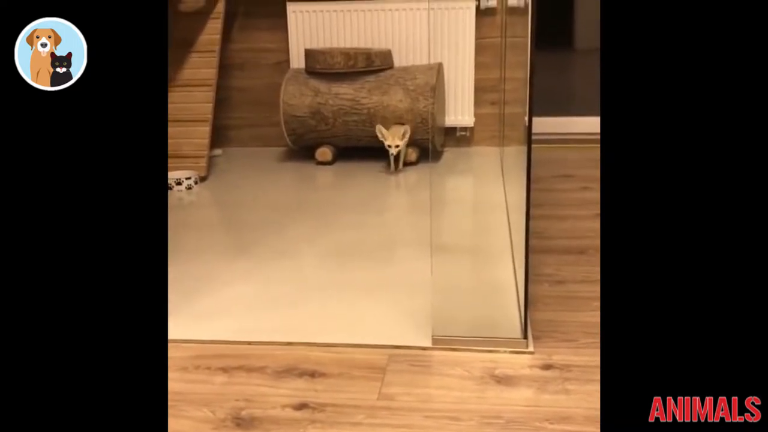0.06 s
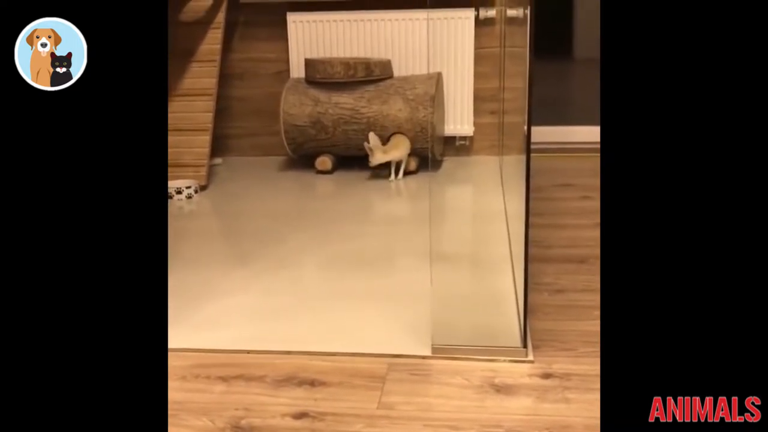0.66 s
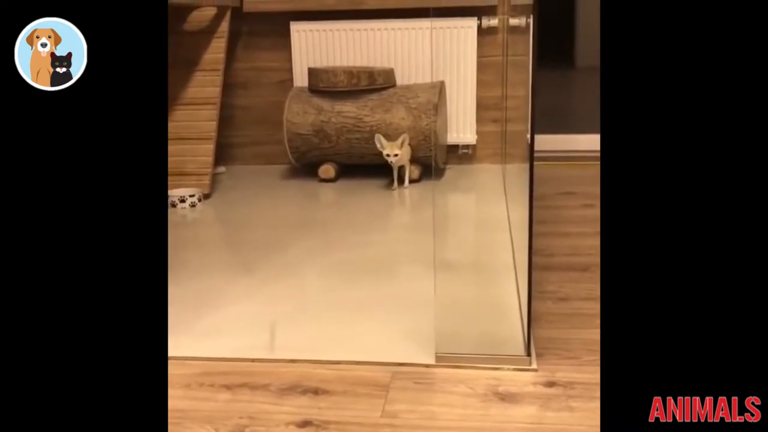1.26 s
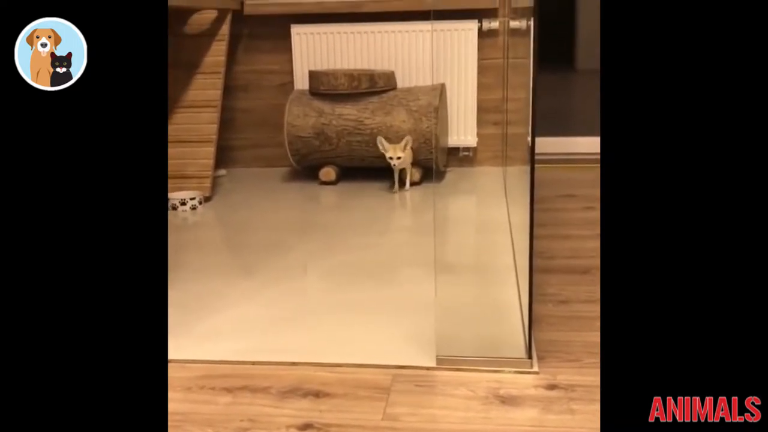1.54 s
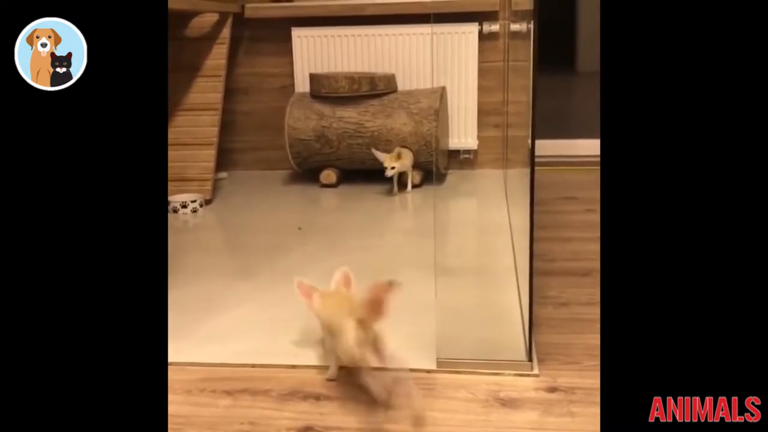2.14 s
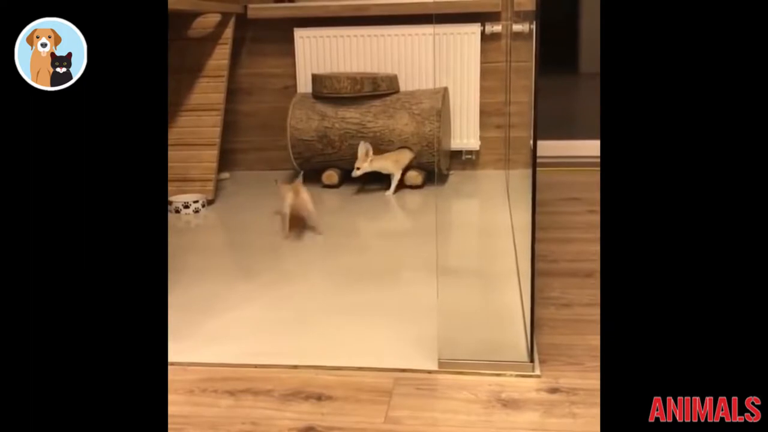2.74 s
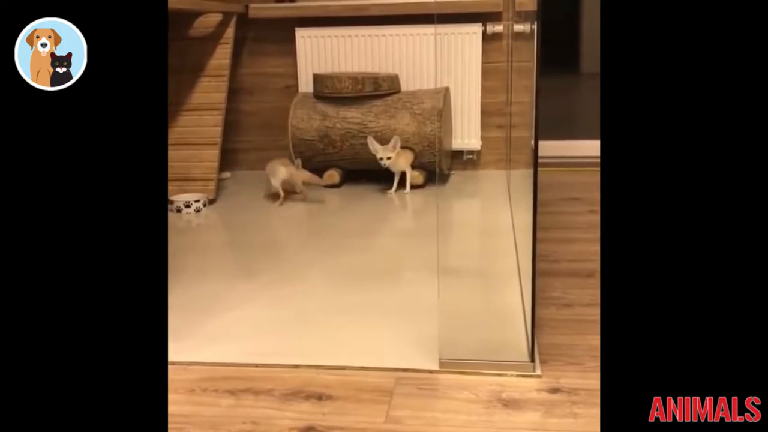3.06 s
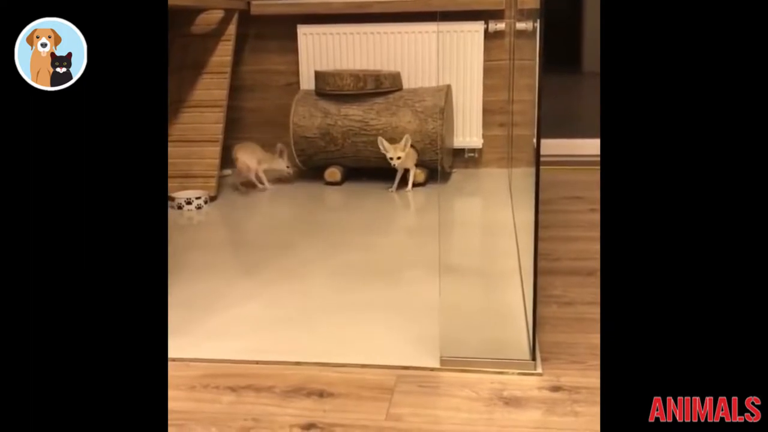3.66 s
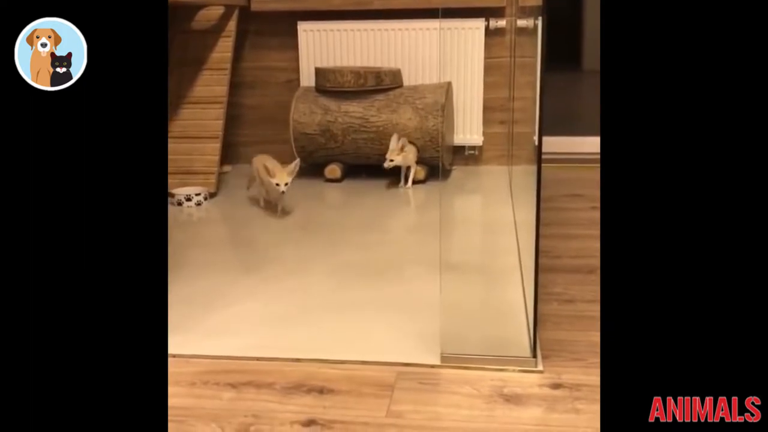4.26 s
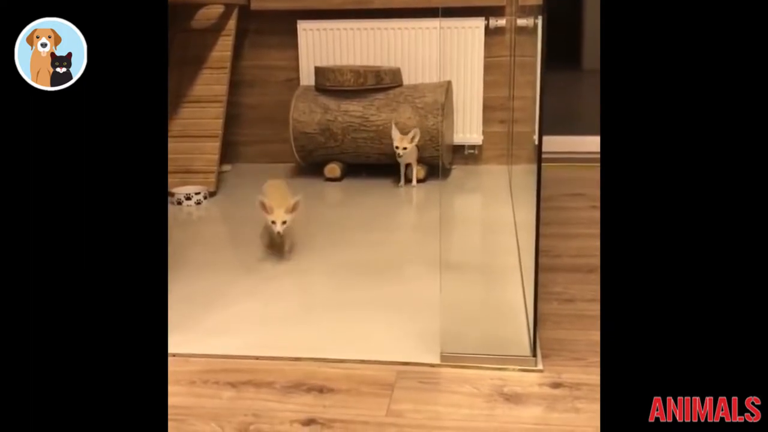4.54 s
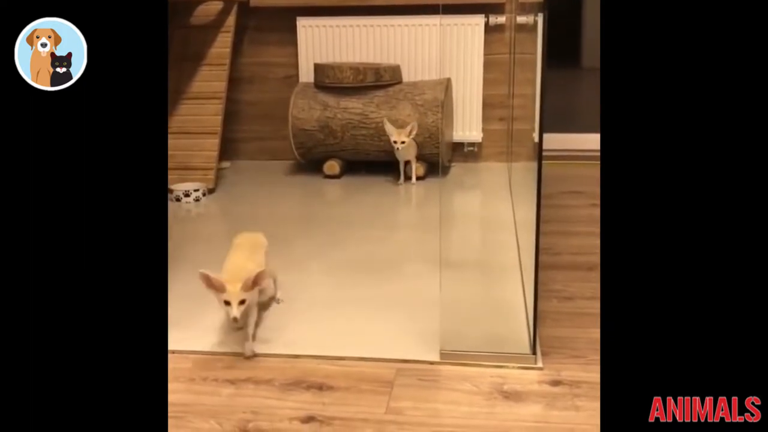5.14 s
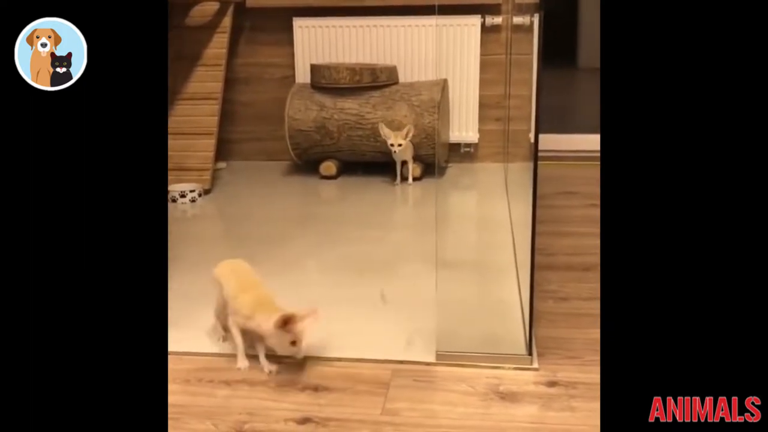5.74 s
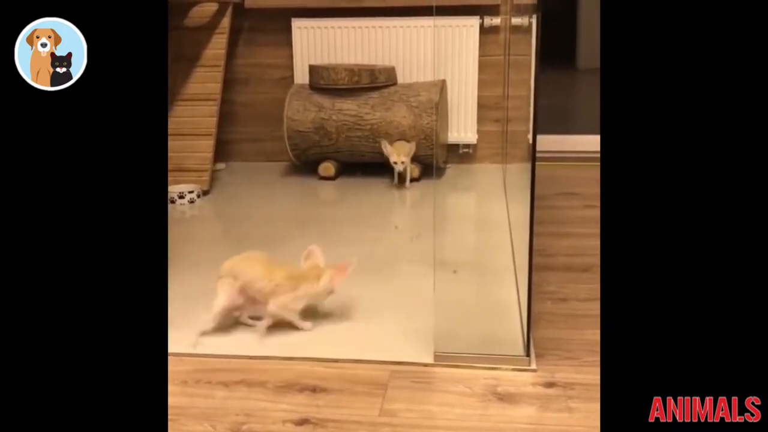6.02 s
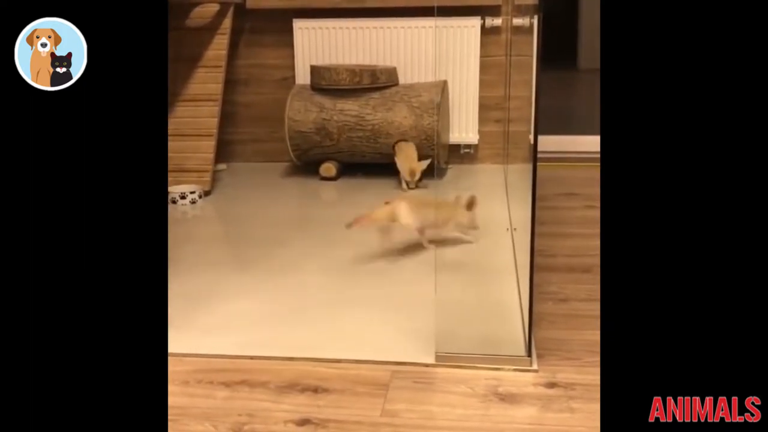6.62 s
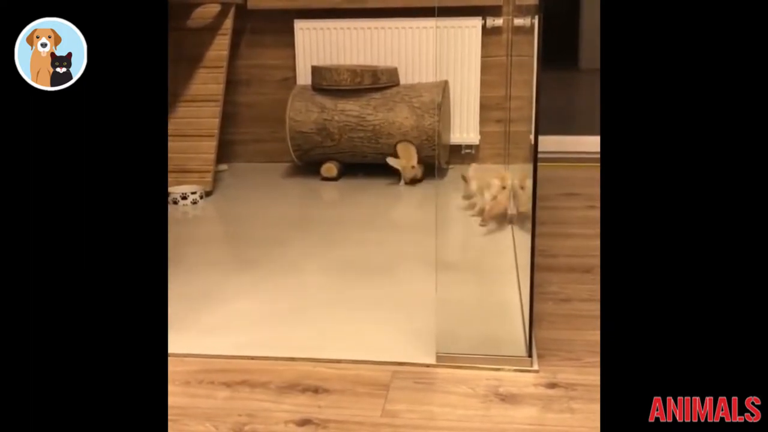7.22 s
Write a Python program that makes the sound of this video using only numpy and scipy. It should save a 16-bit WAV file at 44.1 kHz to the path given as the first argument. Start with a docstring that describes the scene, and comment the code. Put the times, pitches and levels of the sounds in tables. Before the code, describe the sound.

A small fox's claws skitter and scrabble across a hard smooth floor in two quick dashes, in a bare, echoing indoor pen.

```python
"""Two small foxes in a bare, echoing pen with a hard smooth floor, on a hand-held mono microphone.
Over faint room air come far-off scuffs, one sharp snap and a few soft bumps on the microphone. At 1.8 s
one fox bolts from close beside it: the floor board thumps and claws scrabble for grip. From about 3 s
it scuffs and taps around the wooden furniture at the back, then trots forward. At 5.9 s it skitters
off again, and near 7 s its claws give a short squeal on the glass wall."""
import sys
import numpy as np
from scipy import signal
from scipy.fft import rfft, irfft
from scipy.io import wavfile

SR = 44100
rng = np.random.default_rng(int(sys.argv[2]) if len(sys.argv) > 2 else 0)


def put_to_file(sound):
    """Save the sound as 16-bit audio at rate SR, in the file named by the first command-line argument."""
    columns = np.atleast_2d(sound).T  # one column per channel
    safe = np.clip(columns, -1, 1)
    whole_steps = np.round(safe * 32767)
    wavfile.write(sys.argv[1], SR, whole_steps.astype(np.int16))


N = 321489
TIME = np.arange(N) / SR

# tone of the pen's air and of its echo: frequency_hz, level_db
AIR_SPECTRUM = [(15, -50), (25, -23.5), (48, 9), (72, 4), (293, -4), (436, -8.5), (781, -11), (868, -9.5),
                (1920, -13.5), (3930, -16.5), (10500, -20), (12900, -15), (14000, -23.5)]
ECHO_SPECTRUM = [(60, -13), (250, 1.5), (1000, 2.5), (3500, 2), (7000, 2), (14000, 2.5)]
# how long the echo hangs in the pen: frequency_hz, t60_s
ECHO_DECAY = [(100, 2.14), (400, 0.91), (1200, 1.19), (3300, 0.89), (4600, 1.33), (6400, 0.45),
              (9000, 0.71), (14000, 0.41)]
# soft dry bumps on the microphone: start_s, level_db, pitch_hz
MIC_BUMPS = [(1.119, -46, 91), (1.294, -36.5, 104), (1.338, -32, 67), (1.351, -29.5, 56.4),
             (1.478, -43.5, 85)]
# spells of low rumble, from running footfalls on the floor and from handling the microphone:
# middle_s, half_length_s, level_db
LOW_RUMBLES = [(1.42, 0.053, -54.5), (2.42, 0.14, -58.5), (5.36, 0.014, -55), (5.47, 0.059, -49.5),
               (6.43, 0.067, -64), (7.22, 0.028, -59)]
# resonances of that rumble: pitch_hz, width_hz, level_db
LOW_RUMBLE_MODES = [(38, 25, -6), (60, 24, 2), (85, 68, -5), (158, 110, -13.5)]

# dull scuffs of paws and body, far off: middle_s, half_length_s, level_db, tilt_db_per_octave
FAR_SCUFFS = [(0.026, 0.08, -52, -0.3), (0.203, 0.014, -45, 0), (2.824, 0.33, -57.5, 1.5),
              (3.035, 0.016, -61, 4.5), (3.152, 0.042, -54.5, -1.5), (3.217, 0.012, -56, 4),
              (3.298, 0.023, -48.5, 1.4), (3.443, 0.1, -66.5, -1.5), (5.137, 0.018, -60, 2),
              (5.461, 0.013, -51.5, -1), (6.2, .08, -63.5, -7), (6.71, 0.25, -62, 1.5)]
# padded paws land on floor or hollow furniture: middle_s, half_length_s, level_db, pitch_hz
PAW_KNOCKS = [(1.367, 0.0016, -44, 500), (1.396, 0.024, -63, 466), (1.747, 0.0027, -51, 432),
              (2.015, 0.015, -49, 513), (2.075, .005, -48, 850), (2.112, 0.013, -50.5, 500),
              (2.312, 0.017, -42.5, 730), (2.313, 0.0052, -37, 1550), (3.206, .012, -47, 368),
              (3.297, .038, -59, 114), (3.885, 0.0036, -49.5, 1350), (4.196, 0.015, -58.5, 600),
              (4.648, 0.098, -78, 720), (4.848, 0.013, -56, 640), (5.678, 0.062, -65.5, 1040),
              (6.396, .024, -56, 430), (6.885, 0.0094, -57, 410)]
# claws tap wood at the back: start_s, level_db, ring_hz, tilt_db_per_octave
WOOD_TAPS = [(3.7953, -48.5, 2800, -1), (3.8406, -52, 2400, 0.5), (3.881, -44.5, 5700, 1.5),
             (4.0797, -47.5, 4300, 2), (4.106, -42, 2500, 4), (4.1785, -41.5, 4000, 3.5),
             (4.3642, -43, 2700, 2.5)]
# resonances of tapped wood and of claws skidding on glass: pitch_hz, width_hz, level_db
WOOD_MODES = [(1350, 73, -18), (2140, 260, -4), (2500, 260, -7), (5660, 500, -7)]
GLASS_MODES = [(1730, 200, -5), (2480, 270, -3), (2700, 260, -5)]
# something small and hard snaps: start_s, level_db, ring_hz, tilt_db_per_octave
HARD_SNAP = [(.6012, -30, 2950, -0.23)]
# the floor board under the leap: pitch_hz, relative_level_db, t60_s
FLOOR_MODES = [(108, -8, 0.33), (269.4, -4, 0.16), (288, -1, 0.12), (344, 0.5, 0.072), (412, -2.5, 0.09),
               (551, -19.5, 0.9), (720, -9.5, 0.069), (980, 10, 0.018)]
# the loudest single claw clicks: start_s, level_db, ring_hz, tilt_db_per_octave
CLAW_CLICKS = [(1.378, -50.5, 5500, 3), (1.469, -51.5, 3700, 3.5), (1.74, -37.5, 4300, 6),
               (1.8251, -33, 4130, 2), (2.0122, -30.5, 3420, -1), (2.0687, -29.5, 5400, 2.5),
               (2.2004, -35, 3730, 5), (2.222, -30.5, 6530, 2), (2.2962, -29, 4160, -1),
               (2.3329, -32, 3800, 1.5), (2.4321, -43, 3700, -4), (4.6038, -54, 4740, -4.5),
               (4.6598, -50.5, 4580, 6.5), (4.7994, -55.5, 5000, 0.5), (4.8344, -43, 5300, -0.5),
               (5.095, -56, 4600, 1), (5.1111, -51, 8500, -3), (5.3162, -47, 3870, -2.5),
               (5.3812, -54.5, 3570, -5), (5.8576, -36.5, 6040, 0.5), (5.8894, -34.5, 3450, 3),
               (5.9456, -33, 5450, 2), (6.0047, -47.5, 3540, -3.5), (6.0935, -37.5, 4070, .5),
               (6.1657, -41, 4230, -1), (6.1913, -39.5, 3940, 1), (6.2617, -47, 4000, -2),
               (6.389, -41, 4100, -1.5), (6.61, -44.5, 3970, 0.5), (7.0958, -46, 5500, -1.5)]
# echo against direct sound of those clicks as the fox moves about: time_s, echo_db
CLICK_ECHO_LEVELS = [(1.8, -1.5), (2.3, -3.5), (4.6, -1.5), (5.3, -2.5), (5.9, 0.5), (6.2, -2), (6.45, 1.5)]
# a walking paw brushes the floor: middle_s, half_length_s, hiss_db
PAW_BRUSHES = [(1.325, 0.014, -57.5), (1.385, 0.038, -58), (1.705, 0.017, -55.5), (3.132, 0.036, -57),
               (4.57, 0.092, -63), (4.718, .018, -62.5), (5.394, .02, -58.5), (5.517, 0.054, -54)]
# claws dig in for grip: middle_s, rasp_db
CLAW_GRIPS = [(2.012, -37), (2.068, -33.5), (2.116, -27), (2.262, -32.5), (2.29, -28.5), (2.2982, -22),
              (2.3146, -20.5), (2.359, -27)]
# effort of the paws through each of the two dashes: time_s, rasp_db, hiss_db
BOLT_EFFORT = [(1.83, -49, -41), (1.85, -49, -38), (1.9, -57, -47.5), (1.955, -48, -36.5),
               (2.03, -40, -45.5), (2.13, -35, -42.5), (2.2, -41, -49), (2.27, -32, -40),
               (2.33, -54, -40.5), (2.45, -51, -42.5), (2.6, -49, -56.5), (2.95, -63.5, -67.5)]
SKITTER_EFFORT = [(5.862, -45, -63), (5.88, -46, -44.5), (5.96, -49, -45), (6.07, -59, -54),
                  (6.2, -53, -50.5), (6.275, -53, -47), (6.32, -61, -60), (6.385, -47.5, -51),
                  (6.6, -54, -53.5), (6.85, -55.5, -58.5), (7.04, -58.5, -60), (7.25, -70, -65)]

# tone of each kind of contact: frequency_hz, level_db
SCUFF_SPECTRUM = [(50, -28), (130, -4), (270, 1.5), (600, 0), (800, -3), (1050, -2), (2000, -9),
                  (2900, -8.5), (6000, -16), (9000, -23), (14000, -29)]
TAP_SPECTRUM = [(150, -17), (420, -23), (600, -0.5), (1000, 1), (2400, -0.5), (3800, -5), (6000, -4),
                (9000, -9), (14000, -12.5)]
SNAP_SPECTRUM = [(120, -18), (270, -6), (420, -6), (720, -7.5), (1050, -2.5), (1500, -9.5), (2200, -8),
                 (2900, -4), (3600, -0.5), (4500, -3), (5700, 2), (7600, 0.5), (10000, -6.5), (14000, -1.5)]
CLICK_SPECTRUM = [(100, -11.5), (300, -11), (620, -6), (1000, -6.5), (1500, -6.5), (2200, -3.5), (3300, 1),
                  (5200, 0), (8000, -1), (14000, -6)]
PAD_HISS_SPECTRUM = [(100, -16.5), (400, 2), (1000, -7.5), (1900, -3.5), (3300, -0.5), (6000, 0.5),
                     (9500, 1), (14000, -0.5)]
CLAW_RASP_SPECTRUM = [(100, -39), (280, -28.5), (650, -12.5), (1150, -15), (2000, -12.5), (3000, -5.5),
                      (4100, 2), (5100, -2), (6700, -2.5), (7700, -11), (14000, -28)]


def from_db(db):
    """Decibels to gain."""
    return 10 ** (np.asarray(db) / 20)


def unit_energy(x):
    """Scale so that the squares sum to one."""
    return x / np.sqrt(np.sum(x ** 2) + 1e-20)


def at_hz(points, hz):
    """Read a table along a log-frequency axis."""
    known_hz, values = np.transpose(points)
    return np.interp(np.log(np.maximum(hz, 1)), np.log(known_hz), values)


def add(track, start_s, sound):
    """Mix a sound into a track from start_s on."""
    start = max(round(start_s * SR), 0)
    track[start:start + len(sound)] += sound[:max(N - start, 0)]


def around(middle_s):
    """The half second about a moment, as a slice."""
    start = max(round((middle_s - .25) * SR), 0)
    return slice(start, start + SR // 2)


def swell(middle_s, half_s, part=slice(None)):
    """A bell-shaped stroke of pressure."""
    return np.exp(-np.minimum(((TIME[part] - middle_s) / half_s) ** 2, 80) / 2)


def coloured(x, spectrum, tilt_db=0, size=2048):
    """Minimum-phase filter, tilted by tilt_db per octave above 400 Hz; white noise keeps its level."""
    hz = np.maximum(np.arange(size // 2 + 1) * SR / size, 1)
    gain_db = at_hz(spectrum, hz) + tilt_db * np.log2(np.maximum(hz, 400))
    cepstrum = irfft(np.log(from_db(gain_db)))
    response = irfft(np.exp(rfft(2 * cepstrum[:size // 2], size)))
    return signal.oaconvolve(x, unit_energy(response))[:len(x)]


def resonate(x, modes):
    """Parallel resonances, each given as pitch_hz, width_hz, peak_db."""
    out = 0
    for hz, width_hz, db in modes:
        r = np.exp(-np.pi * width_hz / SR)
        feedforward = [(1 - r * r) / 2, 0, (r * r - 1) / 2]
        feedback = [1, -2 * r * np.cos(2 * np.pi * hz / SR), r * r]
        out = out + from_db(db) * signal.lfilter(feedforward, feedback, x + 1e-18)
    return out


def ring(hz, t60_s, rise_s):
    """One damped sine after a soft contact."""
    t = TIME[:SR]
    return np.sin(2 * np.pi * hz * t) * from_db(-60 * t / t60_s) * (1 - np.exp(-t / rise_s))


def friction(per_s, spread_db):
    """Stick and slip: tiny random catches of very uneven size; rms 1."""
    sizes = from_db(spread_db * np.minimum(rng.exponential(1, N), 5)) * rng.choice([-1, 1], N)
    catches = rng.random(N) < per_s / SR
    return unit_energy(sizes * catches) * np.sqrt(N)


def hard_contact(spectrum, tilt_db, ring_hz, crack_s, chatter_s, chatter_db, size=2048):
    """A crack, chatter and a short ring: direct sound and room feed, each with 5 ms of unit power."""
    t = TIME[:size]
    envelope = np.exp(-t / crack_s) + from_db(chatter_db) * np.exp(-t / chatter_s)
    burst = envelope * rng.choice([-1, 1], size)
    spike = signal.unit_impulse(size)   # summed over all directions, the spectrum is smooth
    touches = [coloured(x, spectrum, tilt_db) for x in (burst, spike)]
    mode = [(ring_hz, 610, 3)]   # 610 Hz wide, 3 dB over the crack
    return np.array([unit_energy(x + resonate(x, mode)) for x in touches]) * np.sqrt(.005 * SR)


def room_air():
    """The steady low rush and faint hiss of the pen."""
    return coloured(rng.standard_normal(N), AIR_SPECTRUM, size=8192)


def pen_echo(x, first_s, build_s):
    """Dense echoes from bare walls and glass; the top treble dies first."""
    t = TIME[:round(1.3 * SR)]
    edges_hz = np.geomspace(50, 16000, 15)
    white, tail = rng.standard_normal((2, len(t))), 0
    for k, (low, high) in enumerate(zip(edges_hz, edges_hz[1:])):
        band = signal.sosfilt(signal.butter(2, [low, high], "band", fs=SR, output="sos"), white[k % 2])
        tail = tail + band * from_db(-60 * t / at_hz(ECHO_DECAY, np.sqrt(low * high)))
    onset = 1 - np.exp(-np.maximum(t - first_s, 0) / build_s)
    return signal.fftconvolve(x, unit_energy(coloured(tail, ECHO_SPECTRUM) * onset))[:N]


def moving_echo(x, step_s, patterns=5):
    """A running animal keeps meeting a different echo; a few patterns take turns."""
    place = (TIME / step_s).astype(int) % patterns
    return sum(pen_echo(x * (place == k), first_s=0.0023, build_s=0.0021) for k in range(patterns))


def rumble_and_bumps(bump_cycles=2.7):
    """Spells of low rumble from footfalls and handling, and quickly damped jolts of the microphone."""
    rumble = resonate(resonate(rng.standard_normal(N), LOW_RUMBLE_MODES), LOW_RUMBLE_MODES)
    power = sum((from_db(db) * swell(middle_s, half_s)) ** 2 for middle_s, half_s, db in LOW_RUMBLES)
    out = np.sqrt(power) * unit_energy(rumble) * np.sqrt(N)
    for start_s, db, hz in MIC_BUMPS:
        add(out, start_s, from_db(db) * ring(hz, t60_s=bump_cycles / hz, rise_s=0.00034))
    return out


def far_scuffs():
    """Paws and body rub softly, well off the microphone, each scuff with its own brightness."""
    grain = friction(per_s=7000, spread_db=2.5)
    return sum(from_db(db) * coloured(grain * swell(middle_s, half_s), SCUFF_SPECTRUM, tilt_db)
               for middle_s, half_s, db, tilt_db in FAR_SCUFFS)


def paw_knocks(width_share=0.41):
    """Each padded blow stirs a narrow band of the floor or the hollow furniture."""
    out, grain = np.zeros(N), rng.standard_normal(N)
    for middle_s, half_s, db, hz in PAW_KNOCKS:
        part, mode = around(middle_s), [(hz, width_share * hz, 0)]
        pressure = swell(middle_s, half_s, part)
        body = resonate(resonate(grain[part], mode), mode) * pressure
        out[part] += from_db(db) * unit_energy(body) * np.sqrt(np.sum(pressure ** 2))
    return out


def wood_taps(wood_db=-4):
    """Claws knock on wood at the back, and it rings briefly; gives direct sound and room feed."""
    direct, to_room = np.zeros((2, N))
    for start_s, db, hz, tilt_db in WOOD_TAPS:
        tap, feed = hard_contact(TAP_SPECTRUM, tilt_db, hz, crack_s=.001, chatter_s=.041, chatter_db=-6)
        add(direct, start_s, from_db(db) * tap)
        add(to_room, start_s, from_db(db) * feed)
    return [x + from_db(wood_db) * resonate(x, WOOD_MODES) for x in (direct, to_room)]


def glass_squeal(middle_s, half_s):
    """Claws skid at the glass wall, and the stick and slip sets resonances singing."""
    song = resonate(friction(per_s=2200, spread_db=2.0), GLASS_MODES)
    return unit_energy(song) * np.sqrt(N) * swell(middle_s, half_s)


def board_thump(start_s, level_db):
    """The fox pushes off beside the microphone and the floor board rings."""
    out = np.zeros(N)
    board = sum(from_db(db) * ring(hz, t60_s, rise_s=0.0044) for hz, db, t60_s in FLOOR_MODES)
    add(out, start_s, from_db(level_db) * board)
    return out


def hard_clicks(rows, spectrum, chatter_s, bounce_s, bounce_db):
    """Clicks, each with a duller bounce off the nearest surface; gives direct sound and room feed."""
    direct, to_room = np.zeros((2, N))
    for start_s, db, hz, tilt_db in rows:
        click, feed = from_db(db) * hard_contact(spectrum, tilt_db, hz, crack_s=0.00071,
                                                 chatter_s=chatter_s, chatter_db=-7)
        bounce = from_db(bounce_db) * signal.lfilter([.5], [1, -.5], click)
        add(direct, start_s, click)
        add(direct, start_s + bounce_s * rng.uniform(.8, 1.2), bounce)
        add(to_room, start_s, feed)
    return direct, to_room


def dash_effort(dash, strokes_per_s=14.23, spread_db=1.5):
    """The paws push in turn, unevenly; gives the gains of rasp and hiss, silent outside the dash."""
    times_s, *levels_db = np.transpose(dash)
    strengths = rng.standard_normal(256)
    stroke = (TIME - times_s[0]) * strokes_per_s
    uneven_db = spread_db * np.interp(stroke, np.arange(len(strengths)), strengths)
    running = (TIME >= times_s[0]) & (TIME <= times_s[-1])
    return np.array([from_db(np.interp(TIME, times_s, db) + uneven_db) for db in levels_db]) * running


def slipping_paws():
    """Claws catch, rasp and tick while the furry pads hiss over the smooth floor."""
    dash_rasp, dash_hiss = dash_effort(BOLT_EFFORT) + dash_effort(SKITTER_EFFORT)
    rasp_power, hiss_power = dash_rasp ** 2, dash_hiss ** 2
    # a grip is mostly rasp, and half as long when 12.5 dB harder; a brush is mostly hiss
    grips = [(middle_s, 0.0071 * .5 ** ((db + 29) / 12.5), db, db - 20) for middle_s, db in CLAW_GRIPS]
    brushes = [(middle_s, half_s, db - 7, db) for middle_s, half_s, db in PAW_BRUSHES]
    for middle_s, half_s, rasp_db, hiss_db in grips + brushes:
        part = around(middle_s)
        power = swell(middle_s, half_s, part) ** 2
        rasp_power[part] += power * from_db(rasp_db) ** 2
        hiss_power[part] += power * from_db(hiss_db) ** 2
    rasp = coloured(np.sqrt(rasp_power) * friction(per_s=13000, spread_db=2.5), CLAW_RASP_SPECTRUM)
    hiss = coloured(np.sqrt(hiss_power) * friction(per_s=8000, spread_db=3.0), PAD_HISS_SPECTRUM)
    ticks = coloured(dash_hiss * friction(per_s=60, spread_db=2.5), CLICK_SPECTRUM)
    return rasp + hiss + from_db(-6.5) * ticks


def scene():
    """At the microphone: the direct sounds, their echo in the pen, low rumble, bumps and air."""
    clicks, click_feed = hard_clicks(CLAW_CLICKS, CLICK_SPECTRUM, chatter_s=0.0026,
                                     bounce_s=0.0029, bounce_db=-4)
    snap, snap_feed = hard_clicks(HARD_SNAP, SNAP_SPECTRUM, chatter_s=0.0036,
                                  bounce_s=0.0031, bounce_db=3)
    taps, tap_feed = wood_taps()
    slips = slipping_paws()
    thump = board_thump(start_s=1.8435, level_db=-29.5)
    rubs = far_scuffs() + paw_knocks() + from_db(-45.5) * glass_squeal(middle_s=6.985, half_s=0.019)
    direct = clicks + snap + slips + thump + from_db(-0.5) * rubs + from_db(1.5) * taps
    click_echo_db = np.interp(TIME, *np.transpose(CLICK_ECHO_LEVELS))
    to_room = (from_db(click_echo_db) * click_feed + from_db(-2) * snap_feed + from_db(-8.5) * thump
               + from_db(-6) * rubs + from_db(-1) * tap_feed)
    echo = pen_echo(to_room, first_s=0.0095, build_s=0.00053)
    echo += from_db(-6.5) * moving_echo(slips, step_s=.004)
    mono = direct + echo + rumble_and_bumps() + from_db(-64.5) * room_air()
    return np.array([mono, mono])


def record(dry):
    """The microphone loses the bass below 32 Hz; the top is cut steeply at 14 kHz."""
    thin = signal.sosfilt(signal.butter(2, 32, "high", fs=SR, output="sos"), dry)
    return signal.sosfilt(signal.ellip(12, .2, 70, 14000, fs=SR, output="sos"), thin)


dry = scene()
out = record(dry)
put_to_file(out)
```